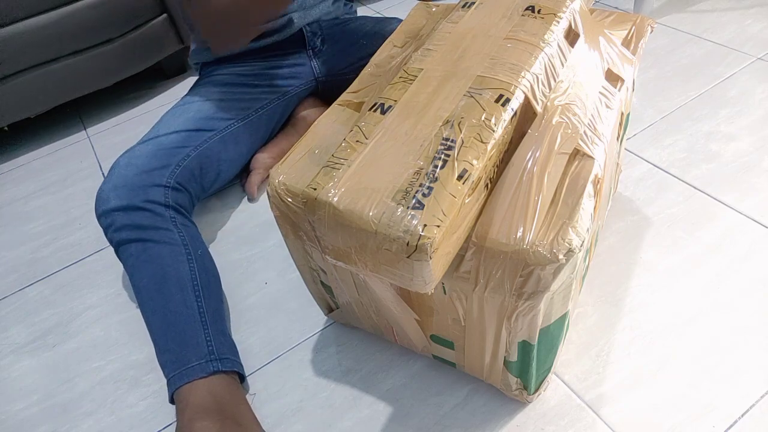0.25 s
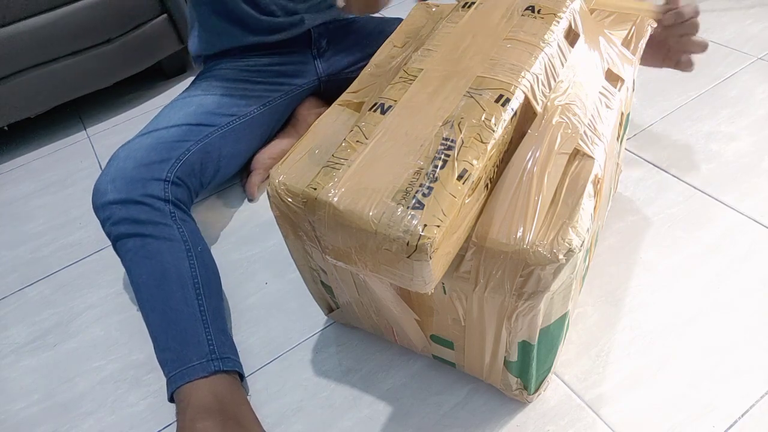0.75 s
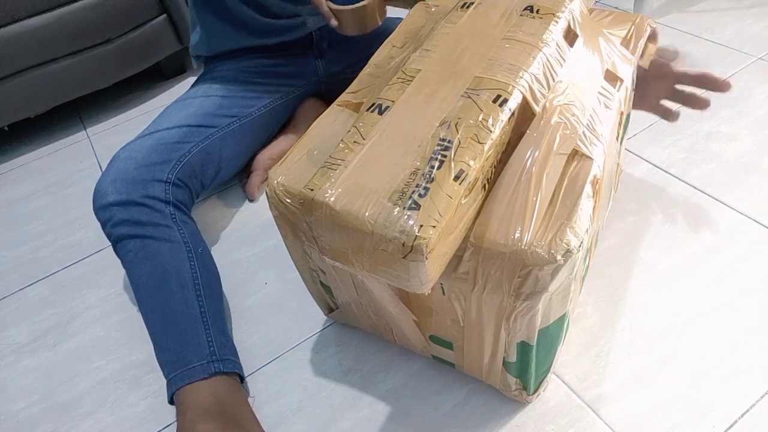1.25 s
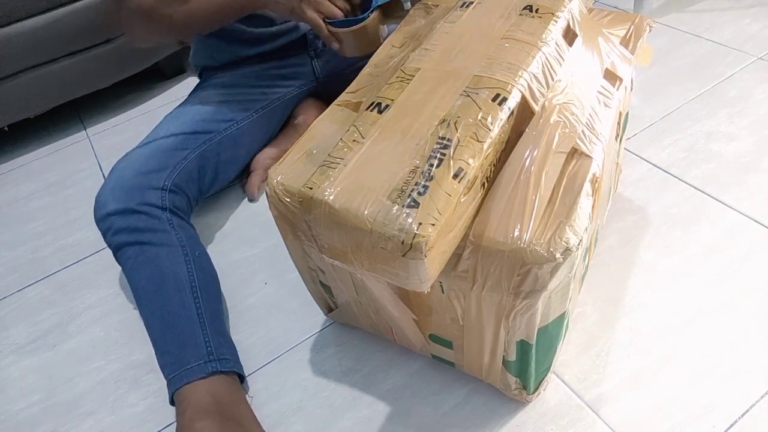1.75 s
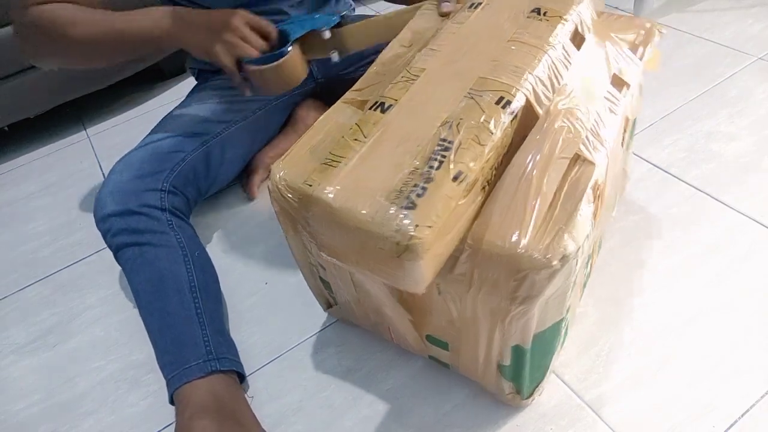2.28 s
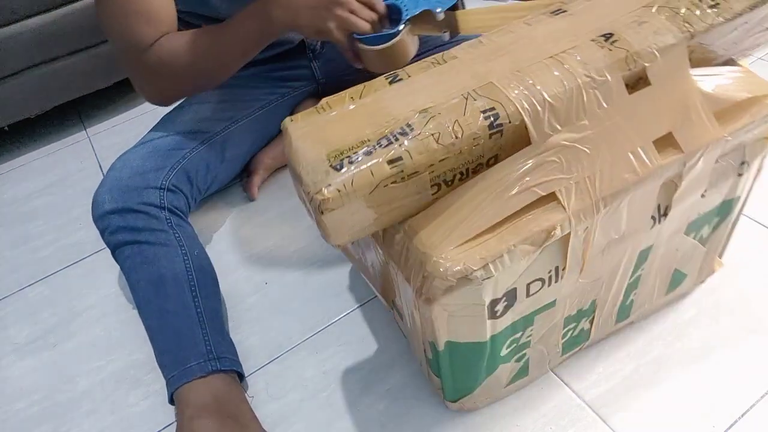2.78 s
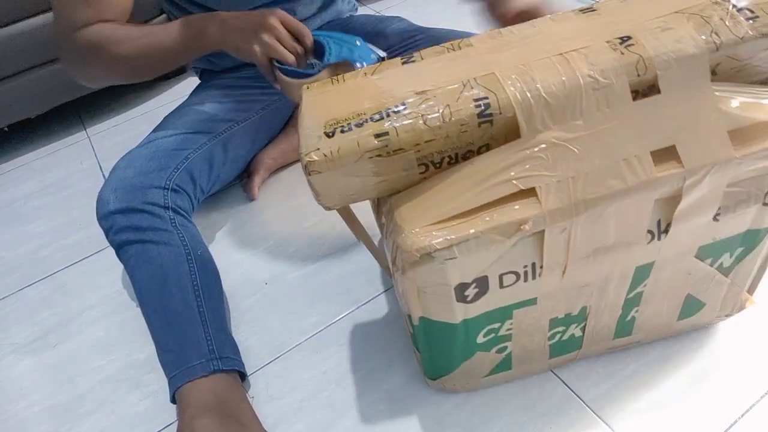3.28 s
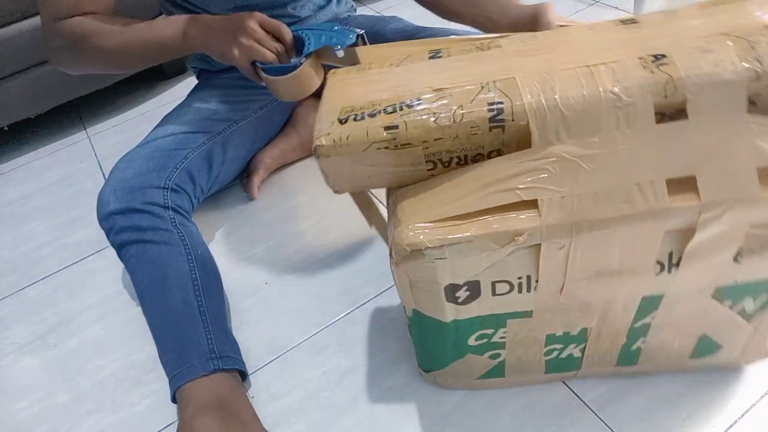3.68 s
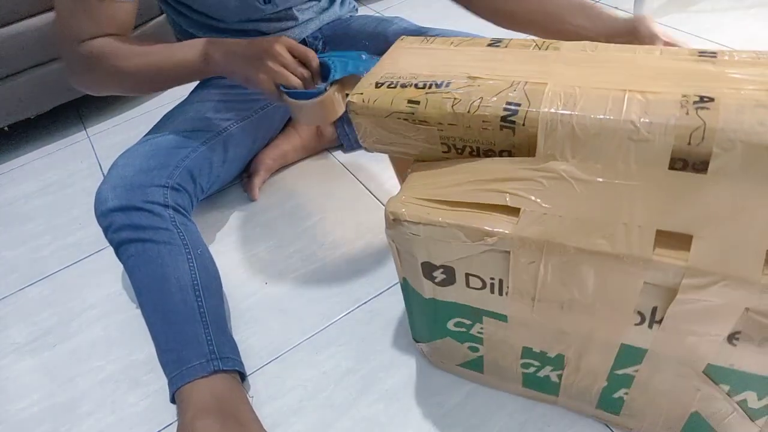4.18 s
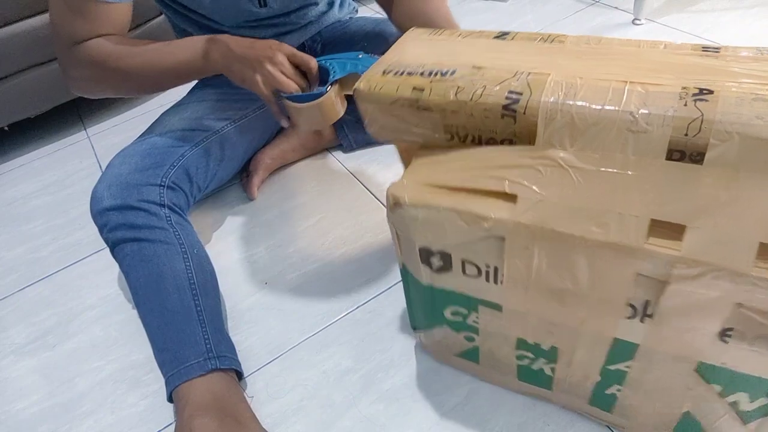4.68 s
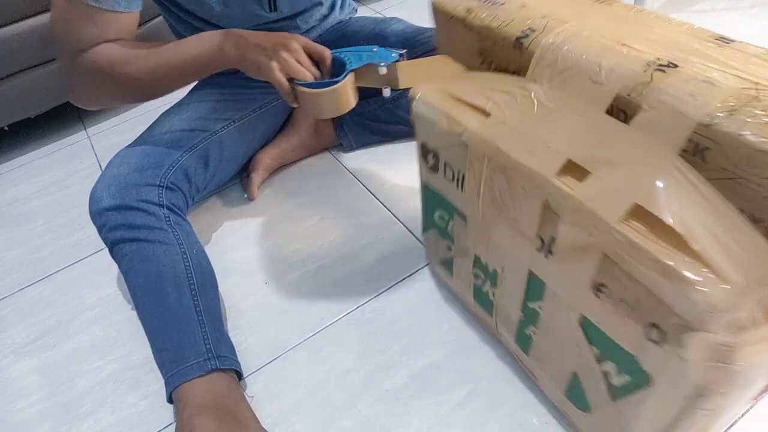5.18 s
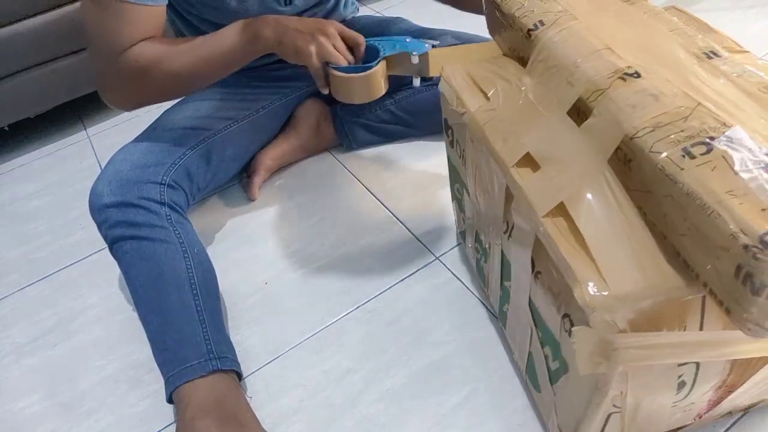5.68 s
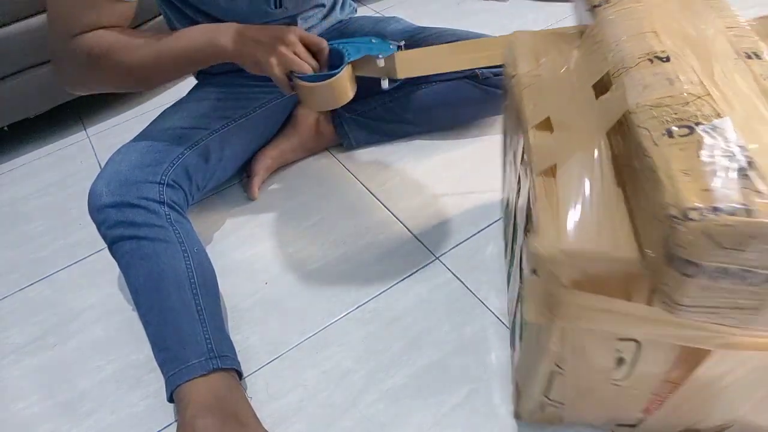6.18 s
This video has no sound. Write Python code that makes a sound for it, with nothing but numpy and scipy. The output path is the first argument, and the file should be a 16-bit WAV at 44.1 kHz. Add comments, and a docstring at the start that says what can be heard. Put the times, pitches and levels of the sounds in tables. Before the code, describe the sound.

Packing tape rips off a hand dispenser in about six loud strokes, each a jerky crackle with a squawking tone. After the first pull, fingers briefly crinkle the loose tape. More pulls follow with short gaps as the tape is wound around a cardboard box, and dull low thumps hit the microphone during the later ones. The sound is close, in a tiled room with a short echo and a faint hum.

```python
"""Packing tape rips off a hand dispenser, squawking and crackling, in six strokes, some in two surges,
and is wound round a cardboard box on a tiled floor. The glue lets go in stick-slip jerks with a fine
crackle between them; the stretched film and the roll ring, and the room answers over a faint hum.
Fingers crinkle the loose tape; dull thumps at the microphone, mostly one-sided, join some hard jerks.
A gain control ducks each stroke and lets the reverb swell up after it."""
import sys
import numpy as np
from scipy import signal
from scipy.fft import rfft, irfft
from scipy.io import wavfile
from scipy.ndimage import uniform_filter1d, minimum_filter1d

SR = 44100
rng = np.random.default_rng(int(sys.argv[2]) if len(sys.argv) > 2 else 0)


def to_wav(sig):
    """Store sig (one row per channel, or 1-D mono) as 16-bit WAV at the path in sys.argv[1].

    Samples outside -1..1 are clipped; the rate is SR.
    """
    pcm = np.clip(np.atleast_2d(sig), -1, 1) * 32767
    pcm = np.round(pcm).astype(np.int16)
    wavfile.write(sys.argv[1], SR, pcm.T)  # frames by channels


N = 284445
DRIVE_DB = 8   # boost on the tape and the thumps, and the deepest duck of the gain control

# the hard stick-slip jerks that stand out: (time [s], relative level [dB], brightness [dB])
JERKS = [(.0293, -23, -8), (.1051, -22, 6), (0.1425, -23, 26), (0.429, -29, -3), (0.4735, -20, 3),
         (1.6874, -23.5, 0), (1.7718, -28.5, 6), (1.823, -21.5, -10), (1.8411, -20, 3), (1.9958, -20, 11),
         (2.0085, -23, 0), (2.0273, -20, 9), (2.0428, -22, 4), (2.0662, -18.5, -0.5), (2.5204, -22.5, -0.5),
         (2.6351, -20.5, 7), (2.7833, -22.5, 5), (2.84, -20.5, -5), (3.1054, -25, 39), (3.1402, -27.5, 30),
         (3.1846, -24, 11), (3.2118, -20, -6), (3.242, -18.5, 2), (3.2721, -18.5, 0), (3.3049, -17, -8),
         (3.3389, -18, -5), (3.3706, -15, -19), (3.4149, -14.5, -3), (3.4729, -14.5, -13),
         (3.568, -16.5, -11), (3.6365, -17.5, -7), (3.6818, -16.5, -3), (3.7131, -22, 0), (3.7306, -18, 0),
         (3.754, -22, 1), (3.7795, -18.5, 1), (3.814, -19.5, 3), (3.8431, -15, -8), (4.4652, -18.5, -9),
         (4.5195, -20.5, -8), (4.5705, -18, -7), (4.628, -19.5, -5), (4.6993, -20, -4), (4.7546, -18, 10),
         (4.7965, -15.5, -2), (4.8534, -20, -10), (4.8853, -23.5, 1), (4.9184, -18, -20), (4.9381, -26, -1),
         (4.9708, -15.5, -22), (5.005, -16.5, -4), (5.0325, -14.5, -14), (5.6086, -21, -6),
         (5.6271, -21.5, 11), (5.6754, -19.5, -6), (5.7332, -19.5, -8), (5.7658, -23.5, 3),
         (5.794, -16, -9), (5.8803, -16.5, 2), (5.9093, -15.5, -10), (5.9215, -13, -2), (5.9334, -19, -5),
         (5.953, -15.5, 12), (5.9754, -18.5, 3), (6.0195, -13, -11)]


def from_db(db):
    """Decibels to gain."""
    return 10 ** (np.asarray(db) / 20)


def rms_one(x):
    """Scale to rms 1."""
    return x / np.sqrt(np.mean(x ** 2) + 1e-20)


def in_time(rows):
    """Each column of an automation curve at every sample."""
    s, *columns = np.transpose(rows)
    return [np.interp(np.arange(N) / SR, s, c) for c in columns]


def at_hz(points, hz, column=1):
    """One column of a table, read on a log-frequency axis."""
    table = np.array(points)
    return np.interp(np.log(np.maximum(hz, 1)), np.log(table[:, 0]), table[:, column])


def add(track, s, sound):
    """Mix a sound into a track at a time."""
    at = max(0, round(s * SR))
    track[..., at:at + sound.shape[-1]] += sound[..., :N - at]


def through(x, response):
    """Convolve with an impulse response for each channel."""
    return signal.fftconvolve(np.atleast_2d(x), np.atleast_2d(response), axes=-1)[:, :N]


def colour(x, spectrum, size=2048):
    """Minimum-phase EQ of unit power with the given shape."""
    cepstrum = irfft(np.log(from_db(at_hz(spectrum, np.fft.rfftfreq(size, 1 / SR)))))
    cepstrum[1:size // 2] *= 2
    cepstrum[size // 2 + 1:] = 0
    response = irfft(np.exp(rfft(cepstrum)))
    return through(x, response / np.linalg.norm(response))[0]


def tilt(x, bright_db, pivot_hz=4000):
    """Tilt EQ: a see-saw of treble against bass."""
    low = signal.lfilter(*signal.butter(1, pivot_hz, fs=SR), x)
    up = from_db(bright_db / 2)
    return (low / up + (x - low) * up) / np.sqrt((up ** 2 + up ** -2) / 2)


def resonator(hz, width_hz):
    """Coefficients of a resonance with gain 1 at its peak."""
    r = np.exp(-np.pi * width_hz / SR)
    return (1 - r * r) / 2 * np.array([1, 0, -1]), [1, -2 * r * np.cos(2 * np.pi * hz / SR), r * r]


def glide(x, hz, width_hz, size=128):
    """A resonance whose centre moves."""
    out, state = np.zeros(N), np.zeros(2)
    for i in range(0, N, size):
        out[i:i + size], state = signal.lfilter(*resonator(hz[i], width_hz), x[i:i + size], zi=state)
    return out


def pair(mid, side, correlation):
    """Left and right with a given correlation from two unrelated noises."""
    alike = np.clip(correlation, 0, 1)
    return np.sqrt((1 + alike) / 2) * mid + np.sqrt((1 - alike) / 2) * side * np.array([[1], [-1]])


def cracks(size, per_s, spread_db):
    """Random clicks, as of glue threads snapping, a few harder than the rest; rms 1."""
    born = rng.random(size) < per_s / SR
    polarity = rng.choice([-1, 1], size)
    strength = from_db(spread_db * np.minimum(rng.exponential(1, size), 4))
    return rms_one(born * polarity * strength)


def pulling(end_speed=0.44, stop_s=0.007):
    """The arm speeds up, slows and stops dead: tape speed (0-1) and the pull's tone at every sample."""
    # pulls of the arm: (start [s], speeding up [s], slowing down [s], starting speed [0-1],
    # crackle at top speed [dB], brightness [dB], chatter at top speed [dB], film pitch when slow [Hz],
    # pitch sag at top speed [Hz, negative rises], squawk [dB]); levels are relative
    pulls = [(0, 0.011, .04, 1, -13, 9, -28.5, 1800, 16, 6),
             (.06, 0.34, 0.067, 0.6, -17, 4, -26.5, 1683, 157, 6),
             (1.685, 0.25, .03, 0.2, -20, 2, -40, 1680, -70, 12.5),
             (1.875, 0.086, 0.089, 0.93, -18, -3.5, -21, 1530, 230, 4.5),
             (2.531, 0.092, .05, 0.61, -24.5, 3, -34.5, 1800, 230, 8.5),
             (2.618, .11, 0.126, 0.81, -15.5, 3.5, -27.5, 1450, 134, -1.5),
             (3.19, .02, .06, 0.44, -25, -4, -38, 1797, 0, 2),
             (3.37, .15, 0.037, 0.13, -21.5, 4, -40, 1925, 0, 2),
             (3.6, 0.23, 0.043, 0.2, -21.5, -10, -26.5, 1729, 0, -10),
             (4.464, .33, .2, 0.034, -22.5, -0.5, -31.5, 1901, -2, 0),
             (5.036, 0.046, 0.05, .7, -21, -8, -42, 1970, 6, 10.5),
             (5.605, 0.028, 0.083, .6, -34, 2, -50, 1851, 0, -5),
             (5.72, 0.16, .1, 0.068, -18, -4, -20, 1964, 0, -3),
             (5.974, 0.091, 0.061, .4, -25.5, -20.5, -50, 2040, 3, 8.5)]
    t, table = np.arange(N) / SR, np.array(pulls)
    current = np.maximum(np.searchsorted(table[:, 0], t, "right") - 1, 0)
    start, rise_s, fall_s, start_speed, *tone = table[current].T
    since = t - start
    rise = start_speed + (1 - start_speed) * np.sin(np.pi / 2 * np.clip(since / rise_s, 0, 1)) ** 2
    fall = 1 - (1 - end_speed) * np.clip((since - rise_s) / fall_s, 0, 1) ** 2
    stop = np.exp(-np.maximum(since - rise_s - fall_s, 0) / stop_s)
    return np.maximum(rise * fall * stop, 1e-9), *tone


def peel(jerks, gain, bright_db, level_db=-8.0, flutter_db=2.5, flutter_hz=130,
         slack_db=7.0, tighten_s=0.0063):
    """The peel line creeps on in uneven spurts of tiny cracks; each jerk leaves it briefly slack."""
    t, times = np.arange(N) / SR, np.array([-1] + [row[0] for row in jerks])
    since_jerk = t - times[np.searchsorted(times, t) - 1]
    tension = from_db(level_db - slack_db * np.exp(-since_jerk / tighten_s))
    smoothing = signal.butter(2, flutter_hz, fs=SR, output="sos")
    spurts = rms_one(signal.sosfilt(smoothing, rng.standard_normal(N)))
    crackle = rms_one(cracks(N, per_s=6000, spread_db=3.5) * from_db(flutter_db * spurts))
    crackle = signal.lfilter(*signal.butter(1, 12500, fs=SR), crackle)
    return gain * tension * tilt(crackle, bright_db - 3.5)


def chatter(top_db, speed, bright_db, gap_s=.017, jitter=.2, spread_db=.6, follow=.55, brighter_db=7):
    """Quick, almost regular stick-slip of running tape, giving way to hard jerks; rows as in JERKS."""
    timing, accents = rng.standard_normal((500, 2)).T
    times = np.cumsum(gap_s * np.exp(jitter * timing))
    hard_times, rows = np.array(JERKS)[:, 0], []
    for s, accent in zip(times, accents):
        i = int(s * SR)
        if i < N and speed[i] > .35 and np.min(abs(hard_times - s)) > gap_s / 2:
            db = top_db[i] + follow * 20 * np.log10(speed[i]) + spread_db * accent
            rows.append((s, db, bright_db[i] + brighter_db))
    return rows


def slips(jerks, level_db=-1.5, decay_s=0.0047, lead_s=.0016, crossover_hz=2800, body_db=-2.5,
          set_s=0.12, least_snap=0.3, most_snap=0.54, size=700):
    """Each jerk is a snap in an avalanche of cracks across the tape; in the lows it jumps as one."""
    out, t, last_s = np.zeros(N), np.arange(size) / SR - lead_s, 0
    low, high = [signal.butter(2, crossover_hz, kind, fs=SR) for kind in ("low", "high")]
    click = signal.unit_impulse(size, np.searchsorted(t, 0))
    swell = np.minimum(1 + t / lead_s, 1) * np.exp(-(t / decay_s) ** 2)
    jump = from_db(body_db) * signal.lfilter(*low, click)
    for s, db, bright_db in jerks:
        # glue that has had time to set lets go with more of its energy in one snap
        snap = most_snap - (most_snap - least_snap) * np.exp((last_s - s) / set_s)
        avalanche = cracks(size, per_s=11000, spread_db=6.0) * swell
        crack = np.sqrt(1 - snap) * avalanche / np.linalg.norm(avalanche) - np.sqrt(snap) * click
        jerk = tilt(jump + signal.lfilter(*high, crack), bright_db - 4)
        add(out, s - lead_s, from_db(db + level_db) * np.sqrt(0.0054 * SR) * jerk)
        last_s = s
    return out


def film(x, hz, squawk_db, grip, level_db=1.0, lower_ratio=.735):
    """The free tape is a membrane with a gliding squawk, hollow just below its pitch, and a sizzle."""
    # sizzle of the peel line at full speed: (time [s], centre [Hz], level [dB])
    sizzle = [(.18, 7040, -4), (.26, 7060, 4), (.42, 8550, -2), (.5, 8800, -23)]
    # a second, lower note rings once the film lies on the box: (level against the main note [dB]) by grip
    lower_note_db = [-28, -30, 1.5]
    sizzle_hz, sizzle_db = in_time(sizzle)
    lower_note = from_db(lower_note_db)[grip] * glide(x, lower_ratio * hz, width_hz=45)
    notes = glide(x, hz, width_hz=120) + lower_note
    squawk = np.diff(notes, prepend=0) * SR / (2 * np.pi * hz)   # it radiates by its acceleration
    hiss = from_db(sizzle_db) * glide(x, sizzle_hz, width_hz=1400)
    return from_db(level_db + squawk_db) * squawk + hiss


def tape(sag_power=2.9, roll_loss=0.55):
    """Speed drives crackle and chatter and bends the squawk; the rip rings the film and the roll."""
    # tape colour in three grips (first draw, next two draws, winding): (frequency [Hz], level [dB])
    first_draw = [(120, -20), (300, -14), (420, 0), (600, 4.5), (850, -2), (1300, 5.5), (2200, -1),
                  (3200, 2), (5000, 0.5), (7500, 1), (9000, 2), (11000, -2), (16000, -6)]
    next_draws = [(120, -23), (220, -2.5), (400, 2), (700, -0.5), (1200, 5), (2200, 2), (2750, 2),
                  (3400, 2.5), (5000, 1.5), (7500, 6), (9000, 6.5), (11000, -0.5), (16000, -2)]
    winding = [(120, -27), (300, -13), (470, -2), (700, -6), (1050, -2.5), (1400, -1), (1750, 3),
               (2100, -1.5), (2450, -6), (2900, -2.5), (3600, -3), (5500, 0), (8000, 5), (9000, 3),
               (10500, -0.5), (16000, -2)]
    # ring of the roll and dispenser, a list for each grip: (frequency [Hz], width [Hz], level [dB])
    roll_modes = [
        [(431, 15, 7), (590, 79, -5), (2900, 55, 1)],
        [(431, 29, 8.5), (897, 77, -3), (1566, 23, 0), (2760, 70, 2.5)],
        [(430, 16.9, 9.5), (1522, 16, -0.5), (2755, 35, -8)],
    ]
    speed, crackle_db, bright_db, chatter_db, slow_hz, sag_hz, squawk_db = pulling()
    jerks = sorted(list(map(tuple, JERKS)) + chatter(chatter_db, speed, bright_db))
    force = slips(jerks) + peel(jerks, speed * from_db(crackle_db), bright_db)
    grip = np.digitize(np.arange(N) / SR, [1, 3])   # the grip changes at 1 s and 3 s
    sheet, roll = np.zeros((2, N))
    for k, spectrum in enumerate([first_draw, next_draws, winding]):
        rip = colour(force * (grip == k), spectrum)
        sheet += rip
        for hz, width_hz, db in roll_modes[k]:
            roll += from_db(db) * signal.lfilter(*resonator(hz, width_hz), rip + 1e-18)
    squawk = film(sheet, slow_hz - sag_hz * speed ** sag_power, squawk_db, grip)
    roll *= from_db(-roll_loss * squawk_db)   # the more squawk, the less ring
    return from_db(DRIVE_DB) * (sheet + squawk + roll)


def near_field(x, scatter_s=.0014, size=512):
    """The direct sound reaches the left first; box, floor and moving hands scatter it ever anew."""
    # the moving dispenser: (time [s], lead of the left side [ms])
    lead = [(0, 0.14), (1.7, 0.032), (2.5, 0.037), (3.8, 0.017), (5, .06), (6.3, 0.028)]
    t = np.arange(size) / SR
    blocks = np.pad(x, (0, -N % size)).reshape(1, -1, size)
    scatter = rng.standard_normal((2, blocks.shape[1], size)) * np.exp(-t / scatter_s) * (t > .0003)
    scatter = signal.lfilter(*signal.butter(1, 1200, "high", fs=SR), scatter)
    scatter /= np.linalg.norm(scatter, axis=-1, keepdims=True)
    echoes = irfft(rfft(blocks, 2 * size) * rfft(scatter, 2 * size))
    echoes = echoes[..., :size] + np.roll(echoes[..., size:], 1, axis=1)   # tails ring into the next block
    lag = np.round(in_time(lead)[0] * SR / 1000).astype(int)
    right = x[np.clip(np.arange(N) - lag, 0, N - 1)]
    return np.array([x, right]) + echoes.reshape(2, -1)[:, :N]


def room(x, predelay_s=0.0068, build_s=0.0074, bands=12):
    """A diffuse tail builds up after the first wall echo and rings longest in the mids."""
    # tiled room: (frequency [Hz], t60 [s], wet against dry [dB], left-right correlation [0-1])
    reverb = [(150, 0.4, 1.5, 0.8), (430, 0.32, -3.5, 0.7), (960, 0.57, -3, 0.4), (1800, 0.38, 1.5, 0),
              (3960, 0.42, 1, 0.05), (8300, 0.43, 0, 0), (12500, 0.33, 0, 0.04)]
    t = np.arange(int(.8 * SR)) / SR
    edges = np.geomspace(90, 18000, bands + 1)
    white, tail = rfft(rng.standard_normal((2, len(t)))), 0
    bins = np.fft.rfftfreq(len(t), 1 / SR)
    onset = 1 - np.exp(-np.maximum(t - predelay_s, 0) / build_s)
    for low, high in zip(edges, edges[1:]):
        t60, wet_db, correlation = [at_hz(reverb, np.sqrt(low * high), column) for column in (1, 2, 3)]
        fade = onset * from_db(-60 * t / t60)
        band = irfft(white * ((bins >= low) & (bins < high)), len(t))
        tail = tail + from_db(wet_db) * pair(*band, correlation) * fade / np.linalg.norm(fade)
    return through(x, tail)


def room_tone(noise_db=-44.5, hum_db=-55, hum_hz=60):
    """A steady bed of room noise with a low mains hum."""
    # colour of the noise: (frequency [Hz], relative level [dB])
    spectrum = [(20, -8), (60, 0.9), (110, 0), (250, -1), (500, -3), (1000, -7), (2000, -12), (4500, -14),
                (8500, -12), (11500, -20), (16000, -20)]
    # its stereo image, wider towards the top: (frequency [Hz], left-right correlation [0-1])
    correlation = [(30, 0.95), (300, 0.93), (1500, 0.5), (5000, 0.2)]
    hz = np.fft.rfftfreq(N, 1 / SR)
    white = pair(*rfft(rng.standard_normal((2, N))), at_hz(correlation, hz))
    noise = irfft(white * from_db(at_hz(spectrum, hz)), N)
    hum = np.sin(2 * np.pi * (hum_hz * np.arange(N) / SR + rng.random()))
    return from_db(noise_db) * rms_one(noise) + from_db(hum_db) * rms_one(hum)


def crinkles(level_db=-1.0, size=2500):
    """Fingers crinkle the loose tape: short clusters of crisp clicks."""
    # finger touches: (time [s], relative level [dB], energy decay [s])
    touches = [(0.92, -28, 0.0026), (0.97, -33, 0.0023), (1.01, -25.5, 0.0038), (1.651, -36.5, .008),
               (2.943, -26, .002), (3.086, -34, 0.0052), (4.169, -45, 0.019), (5.562, -32.5, 0.006)]
    # colour of the crinkling tape: (frequency [Hz], relative level [dB])
    spectrum = [(200, -8), (2000, -10.5), (5000, -3.5), (9000, 3), (13000, -4.5)]
    out, t = np.zeros(N), np.arange(size) / SR
    for s, db, decay_s in touches:
        cluster = cracks(size, per_s=10000, spread_db=1) * np.exp(-t / decay_s / 2)
        add(out, s, from_db(db + level_db) * cluster)
    return colour(out, spectrum)


def thumps(level_db=1.0, push_s=0.00099, rebound_s=0.0067, size=2500):
    """Dull low thumps at the microphone: a short push of air and a longer, shallow rebound."""
    # mostly one-sided and on hard jerks: (time [s], relative level [dB], left against right [dB])
    low_thumps = [(0.921, -46, 0), (1.689, -34, -15), (2.648, -39, 19), (3.474, -35, 20), (3.78, -38, -17),
                  (4.522, -23, -24), (4.573, -33, -16), (4.629, -30.5, -26), (4.797, -23.5, 15),
                  (4.854, -30, 3), (5.005, -27.5, 17), (5.034, -19, -13), (5.677, -31, 21),
                  (5.868, -32, 14), (5.936, -17, -16), (5.954, -18, 18), (5.976, -20.5, -7)]
    out, t = np.zeros((2, N)), np.arange(size) / SR
    push, rebound = [t / s ** 2 * np.exp(-t / s) for s in (push_s, rebound_s)]
    puff = (push - rebound) / np.max(push - rebound)
    for s, db, pan_db in low_thumps:
        sides = rms_one(from_db([[pan_db / 2], [-pan_db / 2]]))
        add(out, s - .001, from_db(db + level_db + DRIVE_DB) * sides * puff)
    return out


def ports(x):
    """Each of the two microphone ports favours its own bands."""
    # lean of the ports: (frequency [Hz], left against right [dB])
    lean = [(60, -1.5), (99, -2.5), (160, 2), (270, 0), (450, 0.5), (740, 1.0), (1220, 0.5), (2010, 0.0),
            (3330, 0.0), (5500, -2.5), (9080, 1), (15000, -1.5)]
    lean_db = at_hz(lean, np.fft.rfftfreq(N, 1 / SR))
    return irfft(rfft(x) * from_db(np.array([lean_db, -lean_db]) / 2), N)


def gain_control(x, threshold_db=-18.0, hold_s=0.08, release_db_per_s=450, ahead_s=0.0011):
    """Loud peaks duck the gain just ahead of time; it holds, then recovers quickly."""
    power = uniform_filter1d(np.mean(x ** 2, axis=0), size=110)
    level_db = 10 * np.log10(np.maximum(power, 1e-12))
    over_db = np.clip(level_db - threshold_db, 0, DRIVE_DB)
    hold = int(hold_s * SR)
    held_db = -minimum_filter1d(-over_db, hold, origin=(hold - 1) // 2)
    release = release_db_per_s * np.arange(N) / SR
    cut_db = uniform_filter1d(np.maximum.accumulate(held_db + release) - release, size=130)
    return x * from_db(-np.interp(np.arange(N) + ahead_s * SR, np.arange(N), cut_db))


def scene(places=3, dwell_s=.05):
    """Tape and fingers, close up and in the room, with the low thumps and the room tone."""
    source = tape() + crinkles()
    # the hands keep moving, so the sound enters the room from a few places in turn
    place = np.floor(np.arange(N) / SR / dwell_s) % places
    sends = [uniform_filter1d(1. * (place == k), size=200) for k in range(places)]
    reverb = sum(room(source * send) for send in sends)
    return near_field(source) + reverb + thumps() + room_tone()


def record(dry, ceiling=.8, cutoff_hz=16000):
    """Port colour, gain control, a hard clip on the sharpest peaks and a steep top cut."""
    clipped = np.clip(gain_control(ports(dry)), -ceiling, ceiling)
    return signal.sosfilt(signal.ellip(10, .1, 70, cutoff_hz, fs=SR, output="sos"), clipped)


dry = scene()
out = record(dry)
to_wav(out)
```